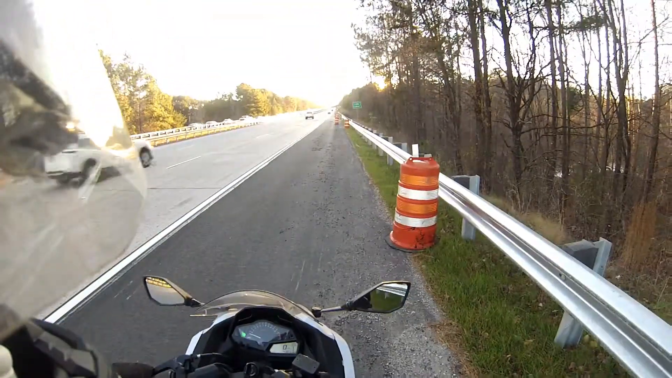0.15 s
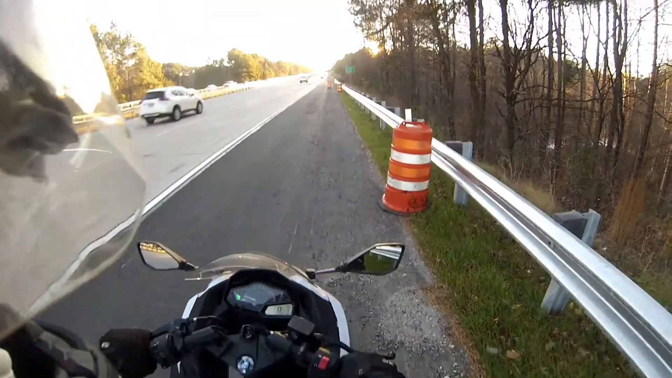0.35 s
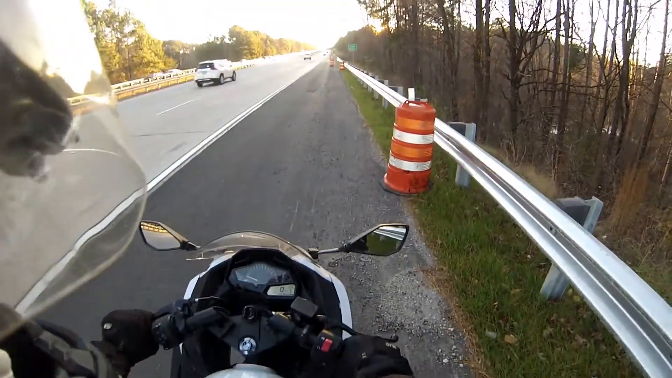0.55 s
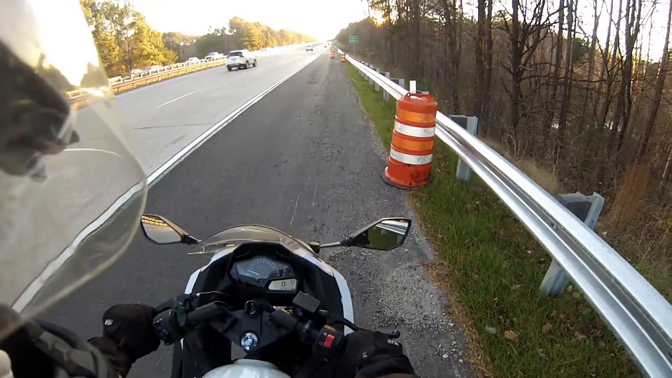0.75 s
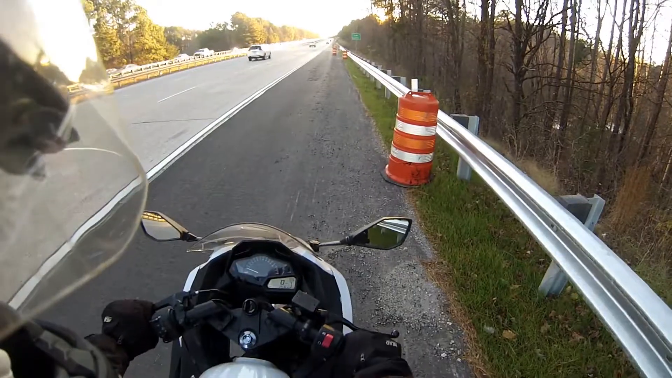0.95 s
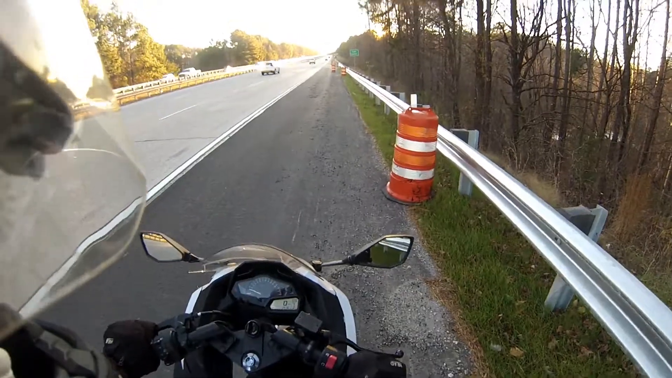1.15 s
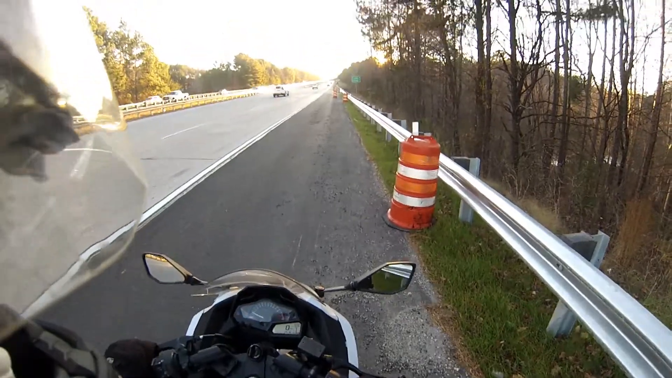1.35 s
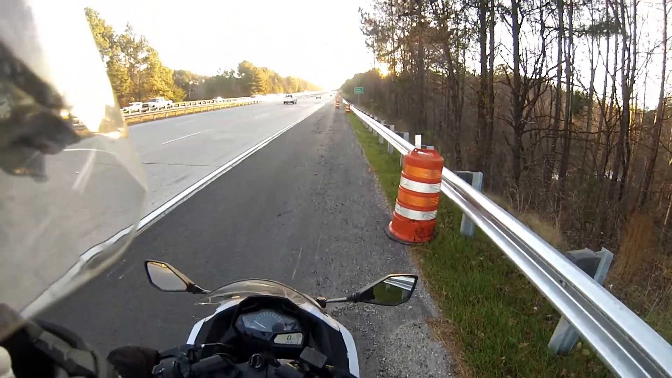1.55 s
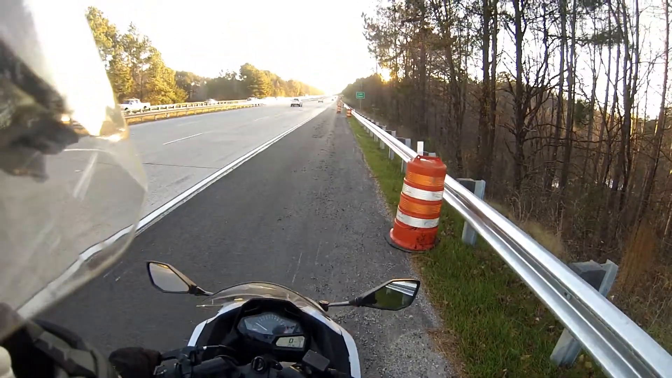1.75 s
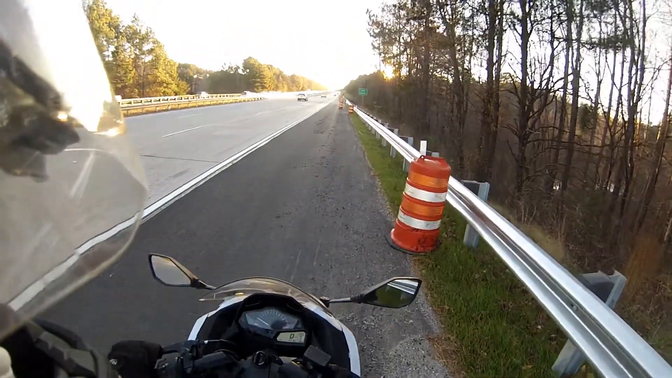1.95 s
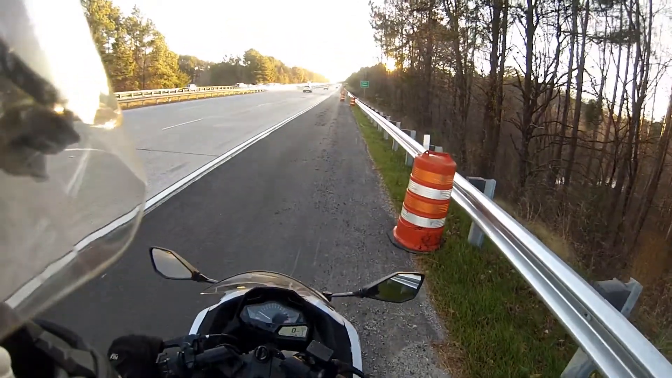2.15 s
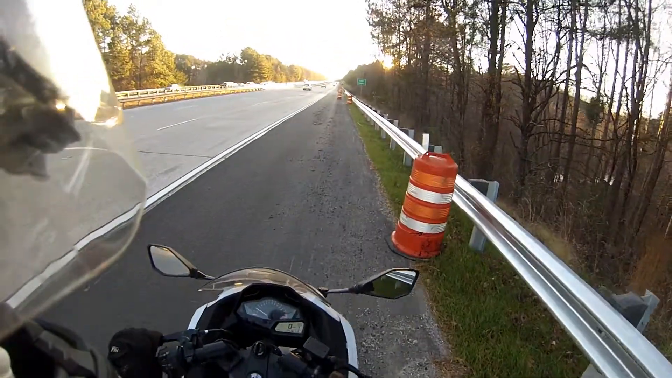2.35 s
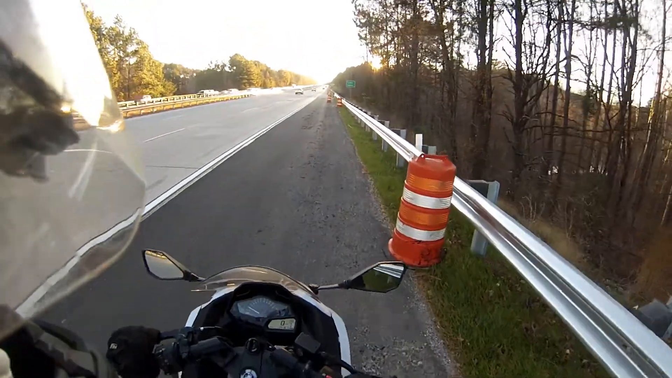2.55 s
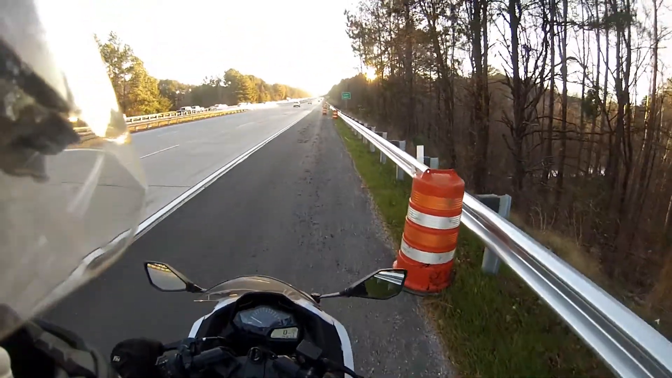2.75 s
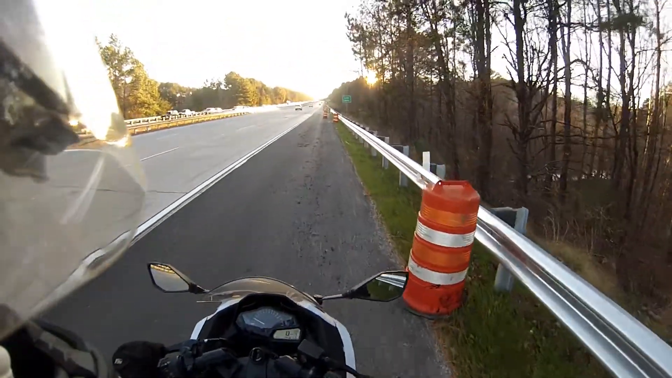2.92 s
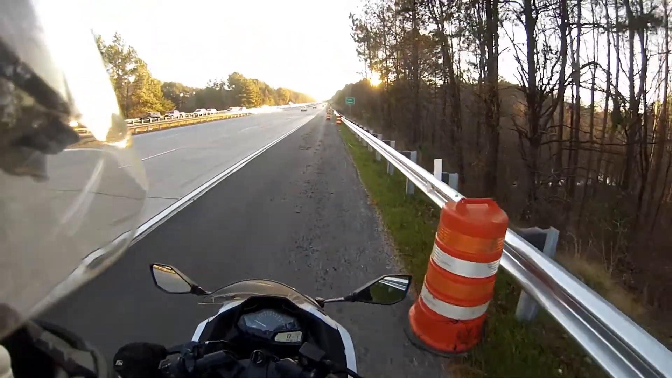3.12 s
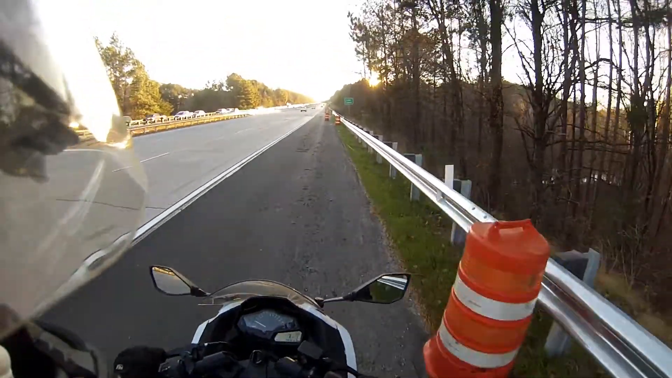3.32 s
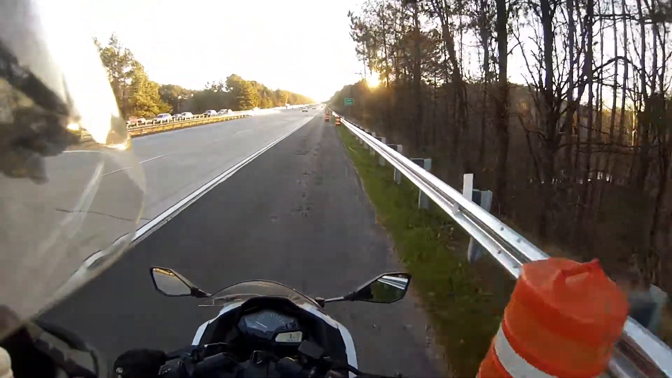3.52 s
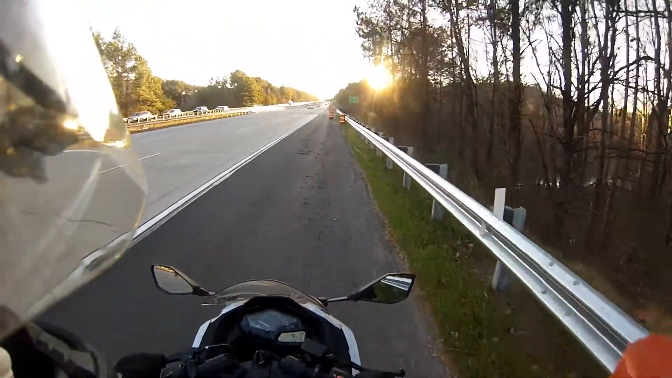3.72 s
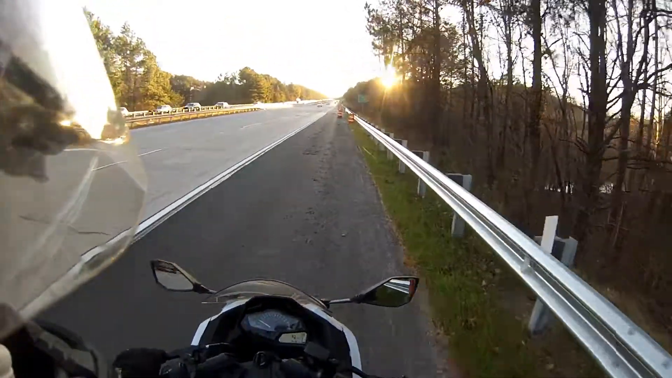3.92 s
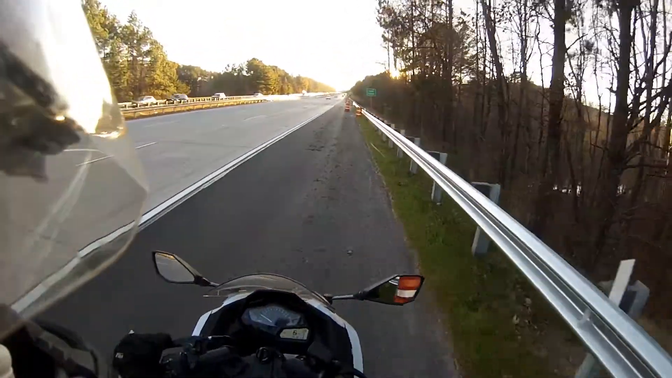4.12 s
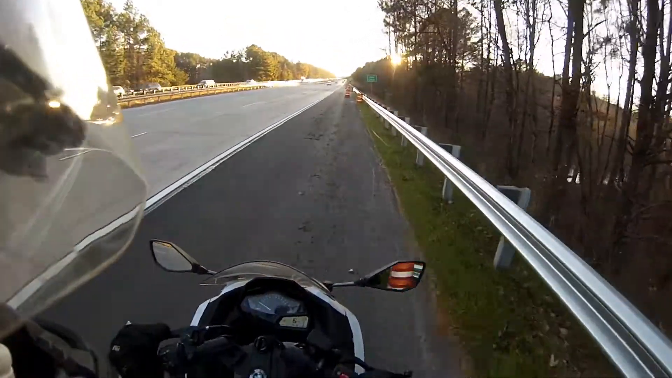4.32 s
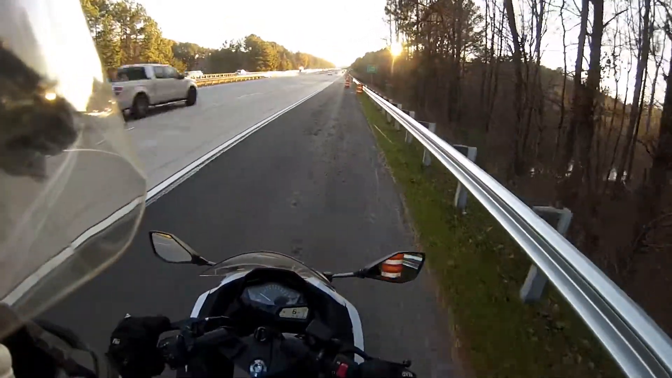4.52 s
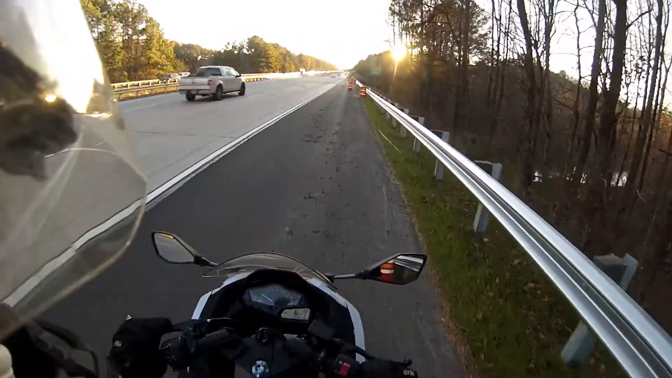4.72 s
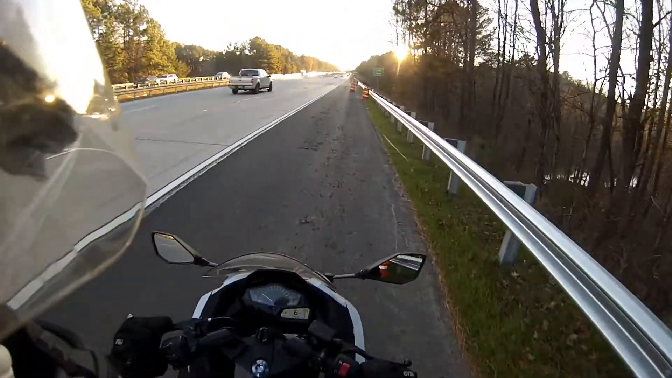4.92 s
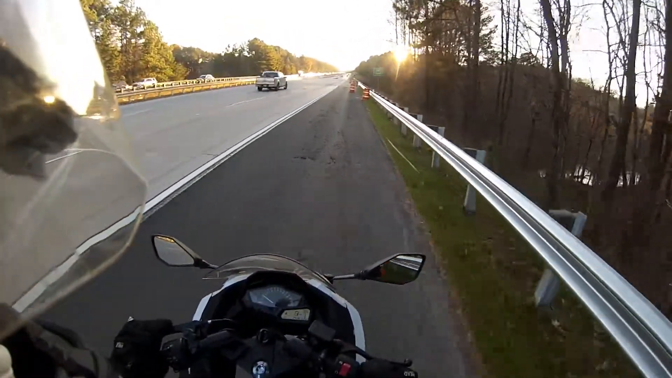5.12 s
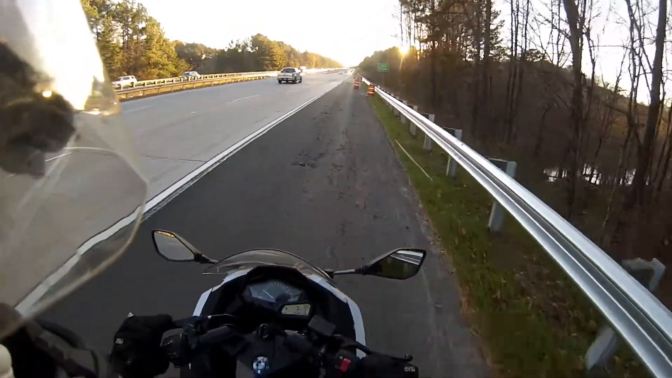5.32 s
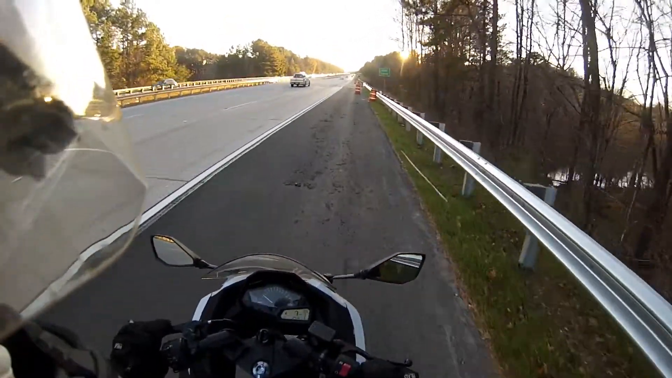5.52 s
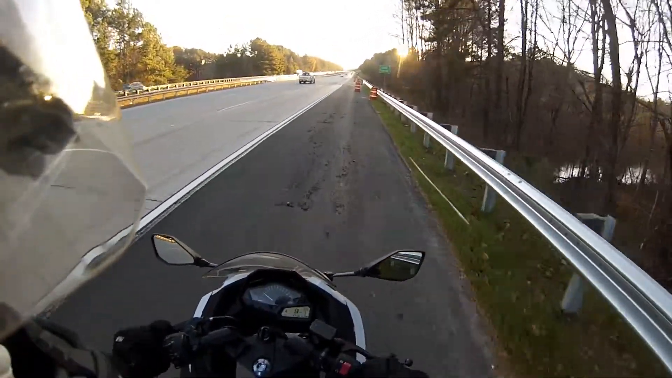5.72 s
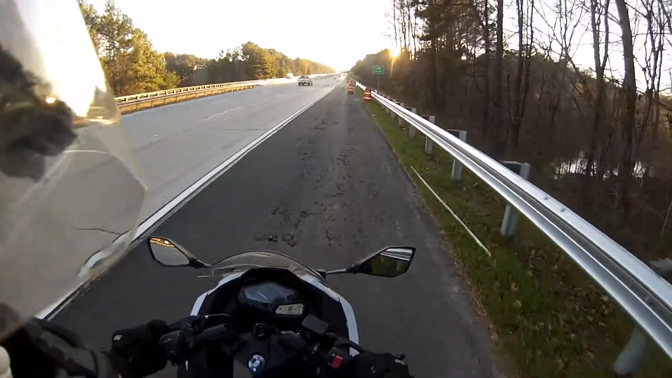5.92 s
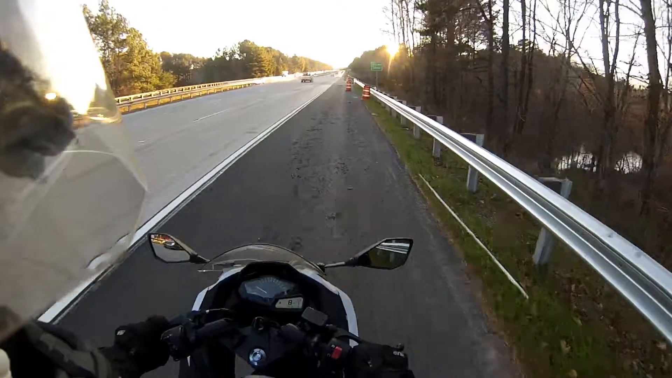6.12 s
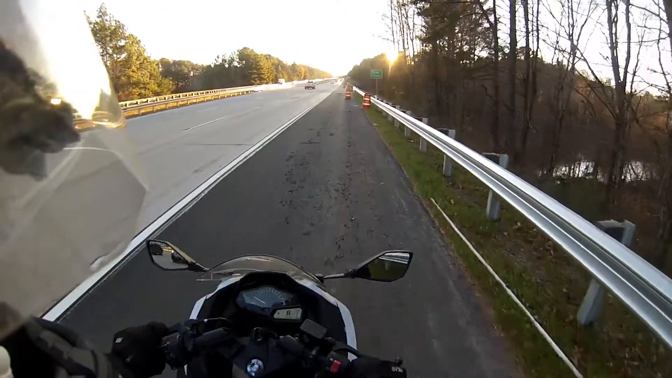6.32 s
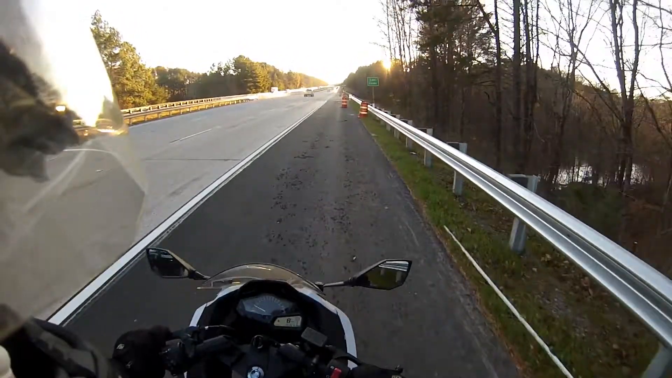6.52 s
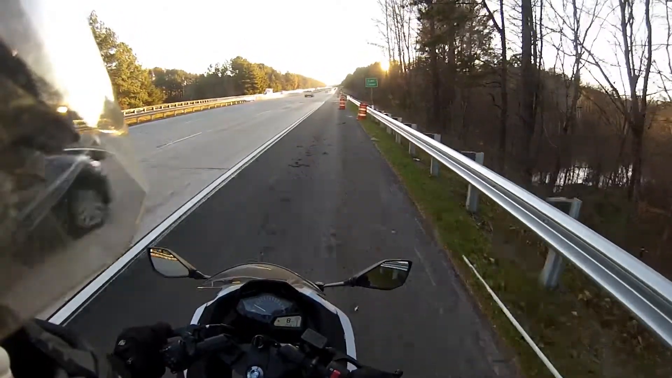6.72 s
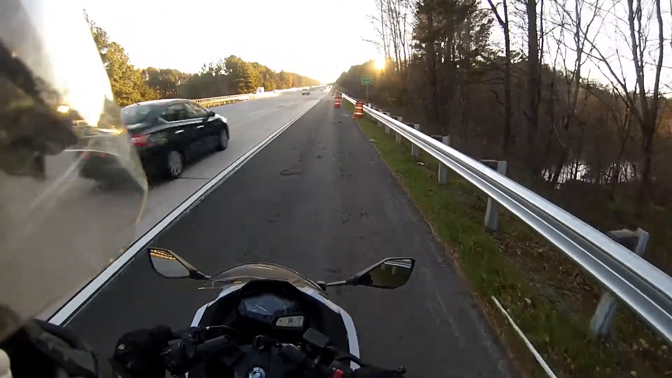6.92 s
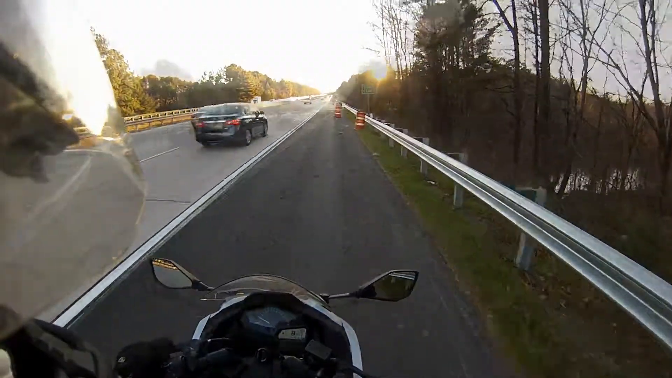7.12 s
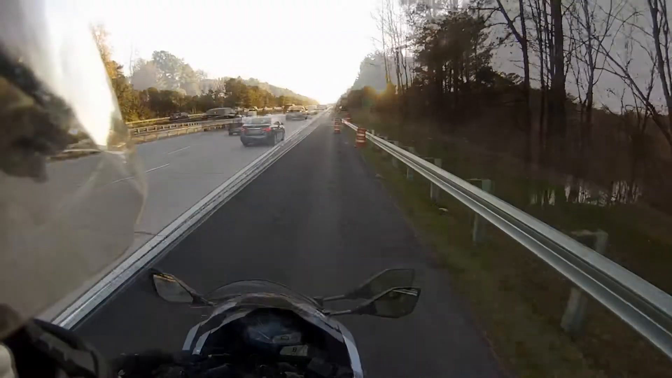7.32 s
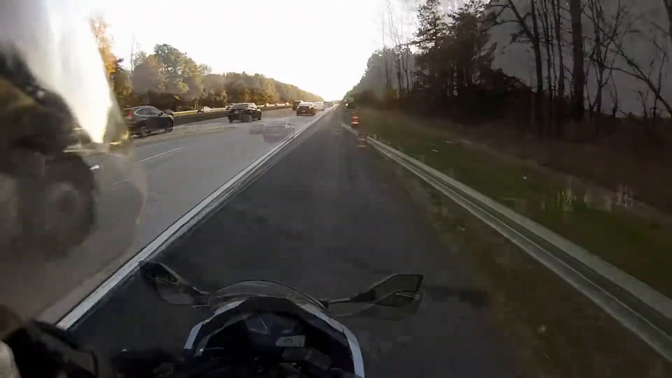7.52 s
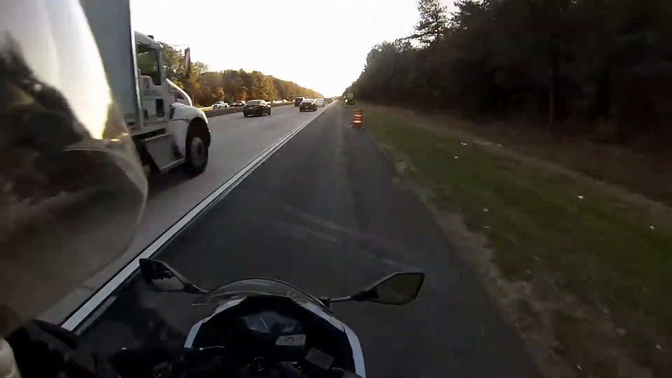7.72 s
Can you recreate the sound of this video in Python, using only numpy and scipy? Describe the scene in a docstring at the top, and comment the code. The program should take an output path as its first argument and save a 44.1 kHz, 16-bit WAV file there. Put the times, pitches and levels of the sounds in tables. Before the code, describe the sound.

Outdoors on a highway shoulder, heard through a helmet-mounted microphone. At the start a car's tyres howl and hiss past over a quiet, low motorcycle burble. Hollow knocks on the plastic case come at 0.1, 0.6-1.2 and 1.7-1.8 seconds, with a faint creak near 0.5. The engine revs up around 1.2-1.6, eases, then climbs from 3.5 to 5.7 and drops in pitch at about 6, as in a shift. Wind swells from 2.5 and becomes heavy, fluttering low rumble after 3.2, with short lulls. Another vehicle rushes by near 4.25, and two more close together around 6.5-6.8, with knocks near 6.9-7. Sound fades to silence at 7.35, then quickly returns beside a truck: dense tyre roar, low drones, a sharp double-edged click at 7.54 and a strong wind buffet, continuing to the end at about 8.

```python
"""A four-cylinder motorcycle burbles and pulls away along a highway shoulder: summed engine orders.
Tyres of passing cars howl, roar and hiss (shaped noise); sliding narrow-band tones drone and whine.
Knocks and ticks sound on a helmet camera's plastic case, as decaying bursts and rung shell modes.
Wind buffets the case: slow noise eddies plus a rocking near 20 Hz.
All fades to silence and returns beside a truck, with one sharp click."""
import sys
import numpy as np
from scipy import signal
from scipy.fft import rfft, irfft
from scipy.io import wavfile
from scipy.ndimage import uniform_filter1d

SR = 44100
rng = np.random.default_rng(int(sys.argv[2]) if len(sys.argv) > 2 else 0)


def digitize_waveform(pressure):
    """Quantize a signal to 16-bit integers and store it at the path in sys.argv[1].

    Rows of a 2-D input are taken as channels; values are limited to [-1, 1].
    """
    field = np.atleast_2d(pressure).T
    bounded = np.clip(field, -1, 1)
    quanta = np.round(bounded * 32767).astype(np.int16)
    wavfile.write(sys.argv[1], SR, quanta)


N = 346626
TIME_S = np.arange(N) / SR
FFT_SIZE, HOP = 2048, 512
BINS_HZ = np.fft.rfftfreq(FFT_SIZE, 1 / SR)
FRAMES_S = np.arange(N // HOP + 5) * HOP / SR

# Engine speed: idle, pulling away, slow climb, shift: (time [s], rate [cycles/s])
ENGINE_RATE = [(1.05, 11.7), (1.25, 13.8), (1.55, 17.9), (2.1, 17.7), (2.5, 15.3), (3.45, 14.8),
               (4.1, 17.9), (4.5, 19), (5.4, 22.3), (5.7, 22.8), (6.15, 15.3), (6.35, 14.2), (7.12, 16)]
# Engine orders: (multiple of cycle rate, relative level [dB])
ENGINE_ORDERS = [(3, -8), (4, 0), (5, -0.5), (6, -22), (7, -12), (8, -5), (9, 0.5), (14, 7)]
# Exhaust response: (frequency [Hz], gain [dB])
EXHAUST_RESPONSE = [(30, -22), (47, -3), (59, 1), (76, 7), (92, 0.5), (115, -10.5), (140, -16.5),
                    (250, -26)]
# Engine loudness as the throttle opens and eases, before trim: (time [s], level [dB])
THROTTLE_LEVEL = [(0, -51), (1.2, -50.5), (1.5, -48), (3.3, -49), (4, -48.5), (5, -42), (5.65, -48),
                  (5.9, -47), (6.35, -51.5), (6.7, -47.5)]

# Noise spectra, relative: (frequency [Hz], density [dB per Hz])
ROAD_SPECTRUM = [(40, 6.5), (100, 2.5), (150, 3.5), (260, -0.5), (340, -0.5), (560, -2), (780, 3),
                 (1000, -3), (1300, 3.5), (2000, -48)]
TRUCK_SPECTRUM = [(40, -7), (100, 2), (170, 6), (270, -2), (350, 3.5), (430, -4.5), (540, 2), (660, 1),
                  (800, -7), (1060, -12), (1300, -3), (2000, -38)]
TREAD_SPECTRUM = [(600, -22), (950, -8), (1150, -6), (1350, 1), (1550, 5), (1750, -6), (2100, -14),
                  (3000, -87)]
SIZZLE_SPECTRUM = [(1200, -6.5), (1750, 2), (2000, 3.5), (2450, 0.5), (2850, -21), (3600, -12), (6000, -39)]
HISS_SPECTRUM = [(1800, -5.5), (2800, 0.5), (3800, -2), (4250, -6.5), (4900, -8), (5600, -10), (6200, -13),
                 (6900, -9.5), (8500, -16), (11000, -22.5), (15000, -32)]
AIR_SPECTRUM = [(3000, -34), (7000, -3), (9000, -6), (10800, -1.5), (12500, -5), (15000, -5)]
# Camera case resonances: (frequency [Hz], width [Hz], lift [dB])
CASE_RESONANCES = [(237, 13, 5.5), (447, 22.4, 9.5), (1320, 42, 2.5), (1454, 30, 3), (1670, 40, 3.5),
                   (2577, 260, 5), (3180, 55, 5), (3520, 48, 8.5), (3770, 63, 6.5), (4700, 71, 6),
                   (4950, 280, 6.5), (6630, 156, 5.5), (6770, 70, 0.5)]
# Vehicles going by, levels before trim: (time alongside [s], half-length [s], tread pitch [Hz],
# road roar [dB], tread howl [dB], tyre sizzle [dB], hiss [dB])
VEHICLE_PASSES = [(0.15, 0.43, 1396, -56.5, -45, -54, -64.5), (4.25, 0.44, 1334, -48, -41, -50.5, -55),
                  (6.45, 0.63, 1680, -79, -49.5, -70, -63), (6.8, 0.58, 1380, -52.5, -39.5, -44.5, -58)]
# Farther traffic, before trim: (road roar [dB], tread howl [dB], tyre sizzle [dB], hiss [dB])
STREAM_LEVELS = (-52.5, -51.5, -58, -63)
# Truck alongside after the silence, before trim: (road roar [dB], tread howl [dB], sizzle [dB], hiss [dB])
TRUCK_LEVELS = (-44, -40.5, -49.5, -52)

# Vehicle drones and whines:
# (start [s], end [s], start pitch [Hz], end pitch [Hz], width [Hz], level [dB])
VEHICLE_TONES = [(1.4, 2.35, 830, 827, 6, -58), (1.38, 2.35, 835, 830, 60, -61),
                 (1.2, 2.4, 3500, 3480, 60, -69), (0.8, 1.9, 3190, 3160, 70, -71),
                 (1.2, 2.2, 3790, 3770, 80, -71), (2.9, 4.4, 812, 790, 150, -58.5),
                 (4.2, 4.9, 945, 915, 50, -57.5), (3.7, 5.2, 442, 436, 40, -60),
                 (4.08, 5.35, 4880, 4790, 380, -61), (7.42, 7.95, 55, 62, 1, -43),
                 (7.45, 7.72, 106, 105, 3, -49), (7.52, 7.675, 176, 170, 2, -42),
                 (7.43, 8, 478, 463, 12, -50), (7.72, 7.92, 428, 412, 10, -48.5),
                 (7.4, 8, 615, 595, 24, -56), (7.44, 7.6, 1002, 995, 8, -52.5),
                 (7.54, 7.85, 970, 964, 12, -49), (7.79, 7.94, 932, 922, 6, -48),
                 (7.38, 7.92, 11500, 9600, 450, -70)]
# Soft hollow knocks: (time [s], thud peak before hollow ring [dB], mid pitch [Hz], half-length [s])
CASE_KNOCKS = [(.076, -31, 666, 0.0025), (0.622, -35, 738, 0.0042), (0.727, -34.5, 730, 0.0043),
               (0.943, -44, 990, 0.0044), (1.065, -39, 775, 0.0054), (1.174, -40, 883, .007),
               (1.701, -45, 620, 0.0047), (1.803, -38.5, 633, 0.0024), (2.75, -42, 463, 0.0038),
               (2.889, -39.5, 610, 0.0029), (4.65, -37, 1300, 0.0044), (6.108, -41, 580, 0.0034),
               (6.901, -33, 1396, .002), (6.995, -31, 1364, 0.0028)]
# Ticks; the first few run together as a creak, the sharp click is a double blow:
# (time [s], peak [dB], brightness [Hz])
CASE_TICKS = [(0.4645, -46, 5000), (0.4672, -43, 7000), (0.4692, -41, 7000), (0.476, -41, 7000),
              (0.4785, -44, 5000), (0.725, -43, 8000), (2.773, -43, 10000), (3.738, -37, 5960),
              (6.039, -37.5, 10000), (7.5444, -9.5, 14000), (7.5456, -12, 8500)]
# Case shell modes: (frequency [Hz], relative level [dB], t60 [s])
SHELL_MODES = [(452, -14.5, 0.065), (890, -19, 0.019), (1490, 1.5, 0.014), (2180, 2.5, 0.01),
               (2520, -0.5, 0.01), (3150, -3, 0.0059), (3537, -5.5, 0.012), (4110, -9, 0.012),
               (4620, -23, 0.047), (5170, -12, 0.013), (6160, -15, 0.0088), (6920, -13, 0.01),
               (11000, -3, 0.0035)]

# Wind on the case, before gusts and lulls: (time [s], buffeting level [dB])
WIND_LEVEL = [(0, -39), (.2, -44.5), (.65, -35), (1.05, -41), (1.4, -38.5), (1.9, -47), (2.5, -32.5),
              (3.15, -29), (3.28, -23.5), (3.88, -23.5), (4.03, -31.5), (4.25, -23), (4.6, -22),
              (5.22, -24), (5.7, -30.5), (6.1, -28.5), (6.3, -25.5), (7.15, -27.5), (7.49, -30.5),
              (7.56, -15.5), (7.63, -23), (7.85, -25.5)]
# Eddy spectrum, relative: (frequency [Hz], level [dB])
BUFFET_SPECTRUM = [(5, -10.5), (14, -5), (21, 0), (25, -4.5), (31, -10), (45, -30), (70, -28.5), (120, -42),
                   (300, -61)]
# Brief lulls in the buffeting: (time [s], depth [dB])
WIND_LULLS = [(1.22, 8), (4.12, 6), (4.75, 16.5), (5.33, 0.5), (6.17, 2.5), (6.71, 5.5)]

# Tyres throw howl forwards and hiss backwards: peak times relative to alongside
HOWL_LEAD_S, SIZZLE_LEAD_S, HISS_LAG_S = 0.46, 0.31, 0.33
HISS_SPREAD = 1.35  # hiss pass length against roar
FALLOFF_POWER, DOPPLER_SHARE = 1.1, 0.066
TREAD_HZ = 1440  # pitch at which TREAD_SPECTRUM is written
AIR_DB, AIR_TRUCK_DB = -73.5, -68.5  # highest hiss, before and beside the truck

FLUTTER_DB, FLUTTER_HZ = 2.5, 4.3  # wavering of vehicle tones in moving air
KNOCK_LIFT_SHARE, RATTLE_DB = 0.4054, -8.5
BOOM_HZ, BOOM_WIDTH_HZ, BOOM_DB = 442.4, 12, 2  # hollow of the case
CRACK_DB, CRACK_DECAY_S = -8, 0.0011  # dry contact snap in a tick

GUST_DB, GUST_HZ, LULL_HALF_S = 2.1, 6, 0.056
ROCK_HZ, ROCK_DB, ROCK_WANDER_SHARE = 20.9, 3, 0.0902  # nominal rate; level against eddies in strong wind
STRONG_DB = -23.5  # buffeting above which rocking has its full level

SILENT_S, FADE_OUT_S, FADE_IN_S_PER_UNIT_GAIN = 7.347, .27, .22
FULL_GAIN, RETURN_GAIN = .9, .06
EDGE_HZ = 15250


def amp(db):
    """Decibels to gain."""
    return 10 ** (np.asarray(db) / 20)


def unit(x):
    """Scales to rms 1."""
    return x / np.sqrt(np.mean(x ** 2) + 1e-20)


def read_db(points, hz):
    """Spectrum in dB, interpolated on a log-frequency axis."""
    f_hz, db = np.transpose(points)
    return np.interp(np.log(hz + 1), np.log(f_hz), db)


def follow(rows, t_s):
    """Value of a two-column curve at times t_s."""
    s, value = np.transpose(rows)
    return np.interp(t_s, s, value)


def add(mix, start_s, sound):
    """Mixes a sound in at start_s."""
    part = mix[round(start_s * SR):][:len(sound)]
    part += sound[:len(part)]


def drift(hz):
    """Slow random signal of rms 1, up to about hz."""
    f_hz = np.fft.rfftfreq(N, 1 / SR)
    lowpass = np.exp(-.5 * (f_hz / hz) ** 2)
    return unit(irfft(rfft(rng.standard_normal(N)) * lowpass, N))


def motorcycle():
    """Firing tone and uneven-cylinder orders beat once an engine cycle, coloured by the exhaust."""
    rate_hz = follow(ENGINE_RATE, TIME_S)
    level_db = follow(THROTTLE_LEVEL, TIME_S)
    turns = np.cumsum(rate_hz * (1 + 0.0067 * drift(10.9))) / SR
    tone = np.zeros(N)
    for order, db in ENGINE_ORDERS:
        gain = amp(db + read_db(EXHAUST_RESPONSE, order * rate_hz))
        tone += gain * np.cos(2 * np.pi * (order * turns + rng.random()))
    return amp(level_db + 1.0 + 0.47 * drift(14.0)) * unit(tone)


def nearness(peak_s, half_s):
    """Gain of a vehicle on a straight lane, 1 at its loudest moment peak_s."""
    return np.hypot(1, (TIME_S - peak_s) / half_s) ** -FALLOFF_POWER


def rush(spectrum, patchy_db, doppler=1):
    """Patchy noise, shifted by source motion, coloured by the fixed resonances of the case."""
    real, imag, patches = rng.standard_normal((3, len(FRAMES_S), len(BINS_HZ)))
    patches = uniform_filter1d(patches, size=6, axis=0)
    patches = unit(uniform_filter1d(patches, size=16, axis=1))
    case_db = sum(db / (1 + (2 * (BINS_HZ - hz) / width_hz) ** 2) for hz, width_hz, db in CASE_RESONANCES)
    source_hz = BINS_HZ / np.reshape(doppler, (-1, 1))
    skirt = 1 / (1 + (source_hz / spectrum[-1][0]) ** 4)
    gain = skirt * amp(read_db(spectrum, source_hz) + case_db + patchy_db * patches)
    frames = (real + 1j * imag) * gain
    return unit(signal.istft(frames.T, nperseg=FFT_SIZE, noverlap=FFT_SIZE - HOP)[1][:N])


def traffic():
    """Tyres on concrete: howl leads, high as a vehicle nears and sinking as it goes by; hiss trails."""
    beside_truck = TIME_S > SILENT_S
    roar_gain, howl_gain, sizzle_gain, hiss_gain = (
        amp(np.where(beside_truck, near_db, far_db))
        for far_db, near_db in zip(STREAM_LEVELS, TRUCK_LEVELS))
    tread = howl_gain * rush(TREAD_SPECTRUM, patchy_db=1.5)
    for s, half_s, hz, roar_db, howl_db, sizzle_db, hiss_db in VEHICLE_PASSES:
        approach = np.tanh((FRAMES_S - s + HOWL_LEAD_S / 2) / half_s)
        doppler = hz / TREAD_HZ * (1 - DOPPLER_SHARE * approach)
        howl = rush(TREAD_SPECTRUM, patchy_db=2.0, doppler=doppler)
        tread = tread + amp(howl_db) * nearness(s - HOWL_LEAD_S, half_s) * howl
        # power sums
        roar_gain = np.hypot(roar_gain, amp(roar_db) * nearness(s, half_s))
        sizzle_gain = np.hypot(sizzle_gain, amp(sizzle_db) * nearness(s - SIZZLE_LEAD_S, half_s))
        hiss_gain = np.hypot(hiss_gain, amp(hiss_db) * nearness(s + HISS_LAG_S, half_s * HISS_SPREAD))

    truck_rumble = amp(-1.0) * rush(TRUCK_SPECTRUM, patchy_db=1.5)
    rumble = np.where(beside_truck, truck_rumble, rush(ROAD_SPECTRUM, patchy_db=1.0))
    road = roar_gain * amp(0.5 + 0.9 * drift(23)) * rumble
    tread = tread * amp(0.13 * drift(35))
    sizzle = sizzle_gain * amp(-0.24) * rush(SIZZLE_SPECTRUM, patchy_db=1.0)
    hiss = hiss_gain * amp(1.5) * rush(HISS_SPECTRUM, patchy_db=1.0)
    air_db = np.where(beside_truck, AIR_TRUCK_DB, AIR_DB) + 0.69 * drift(11)
    air = amp(air_db) * rush(AIR_SPECTRUM, patchy_db=2.5)
    surface_gain = amp(0.66 * drift(30))  # uneven road shakes all tyre noise together
    return (road + tread + sizzle + hiss) * surface_gain + air


def whines():
    """Engine drones, singing tyres and a turbo whistle: narrow noise bands that swell and slide."""
    out = np.zeros(N)
    for start_s, end_s, from_hz, to_hz, width_hz, db in VEHICLE_TONES:
        count = min(N, max(16, int((end_s - start_s) * SR)))
        blur = (drift(width_hz / 2) + 1j * drift(width_hz / 2))[:count]
        blur /= np.sqrt(uniform_filter1d(abs(blur) ** 2, size=5000))
        turns = np.cumsum(np.linspace(from_hz, to_hz, count)) / SR
        tone = (blur * np.exp(2j * np.pi * turns)).real
        tone = tone * amp(FLUTTER_DB * drift(FLUTTER_HZ)[:count])
        add(out, start_s, amp(db) * unit(tone) * signal.windows.tukey(count, .5))
    return out


def knocks():
    """Dull knocks of a few cycles, rising in pitch, with a brief rattle and a hollow case ring."""
    out = np.zeros(N)
    t_s = np.arange(-900, 2200) / SR
    for s, db, hz, half_s in CASE_KNOCKS:
        pitch_hz = hz * (1 + KNOCK_LIFT_SHARE * np.tanh(t_s / half_s))
        turns = np.cumsum(pitch_hz) / SR + rng.random()
        thud = np.exp(-(t_s / half_s) ** 2) * np.sin(2 * np.pi * turns)
        band = signal.butter(2, [0.5 * hz, 1.4 * hz], "bandpass", fs=SR, output="sos")
        rattle = unit(signal.sosfilt(band, rng.standard_normal(len(t_s))))
        rattle *= np.exp(np.minimum(t_s / 0.0027, -t_s / 0.015))
        add(out, s + t_s[0], amp(db) * (thud + amp(RATTLE_DB) * rattle))
    hollow = signal.iirpeak(BOOM_HZ, BOOM_HZ / BOOM_WIDTH_HZ, fs=SR)
    return out + amp(BOOM_DB) * signal.lfilter(*hollow, out)


def ticks():
    """Small blows snap and ring the shell modes; a lower brightness favours the low modes."""
    out = np.zeros(N)
    t_s = np.arange(2200) / SR
    snap_pole = np.exp(-2 * np.pi * 3200 / SR)
    for s, db, bright_hz in CASE_TICKS:
        ring = np.zeros(len(t_s))
        for hz, mode_db, t60_s in SHELL_MODES:
            ring += amp(mode_db - 60 * t_s / t60_s) * np.sin(2 * np.pi * (hz * t_s + rng.random()))
        snap = unit(signal.lfilter([1], [1, -snap_pole], rng.standard_normal(len(t_s))))
        blow = ring + amp(CRACK_DB) * snap * np.exp(-t_s / CRACK_DECAY_S)
        contact = signal.butter(2, min(bright_hz, SR / 2.5), fs=SR, output="sos")
        blow = signal.sosfilt(contact, blow * (1 - np.exp(-t_s / 0.00037)))
        add(out, s, amp(db) * blow / abs(blow).max())
    return out


def wind():
    """Eddies shed by the helmet buffet and rock the case; lighter wind is slower and rocks it less."""
    wind_db = follow(WIND_LEVEL, TIME_S)
    f_hz = np.fft.rfftfreq(N, 1 / SR)
    response = amp(read_db(BUFFET_SPECTRUM, f_hz)) / (1 + (f_hz / 400) ** 2)
    eddies = irfft(rfft(rng.standard_normal(N)) * response, N)
    airspeed = amp(.15 * np.minimum(uniform_filter1d(wind_db, size=SR) + 26, 1))
    # airspeed sets the playing rate of the eddies
    eddies = np.interp(np.cumsum(airspeed) % N, np.arange(N), eddies)
    turns = np.cumsum(ROCK_HZ * airspeed * (1 + ROCK_WANDER_SHARE * drift(7.36))) / SR
    rock_gain = amp(ROCK_DB + np.minimum(wind_db - STRONG_DB, 0))
    buffeting = unit(eddies) + rock_gain * unit(np.sin(2 * np.pi * turns))
    local_rms = np.sqrt(uniform_filter1d(buffeting ** 2, size=6000))
    lull_db = sum(db * np.exp(-((TIME_S - s) / LULL_HALF_S) ** 2) for s, db in WIND_LULLS)
    return amp(wind_db - lull_db + GUST_DB * drift(GUST_HZ)) * buffeting / local_rms


def scene():
    """Sum of all sources at one microphone."""
    return (motorcycle() + traffic() + whines() + knocks() + ticks() + wind())[None]


def record(dry):
    """Linear fade to silence and back, then a low-pass at EDGE_HZ."""
    fade_out = FULL_GAIN * np.minimum((SILENT_S - TIME_S) / FADE_OUT_S, 1)
    fade_in = np.minimum(RETURN_GAIN + (TIME_S - SILENT_S) / FADE_IN_S_PER_UNIT_GAIN, FULL_GAIN)
    fade = np.where(TIME_S < SILENT_S, fade_out, fade_in)
    lowpass = signal.firwin(511, EDGE_HZ, window=("kaiser", 9), fs=SR)
    return signal.oaconvolve(dry * fade, lowpass[None], "same")


dry = scene()
out = record(dry)
digitize_waveform(out)
```